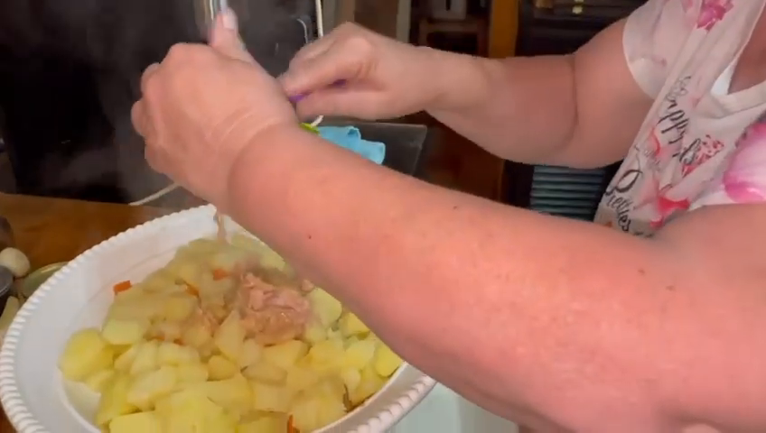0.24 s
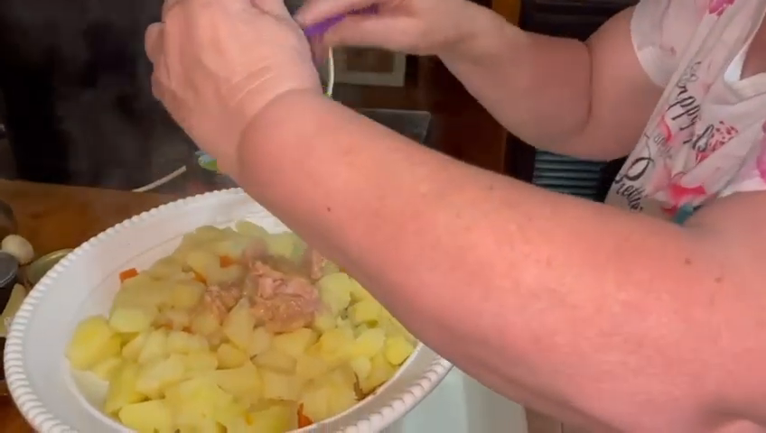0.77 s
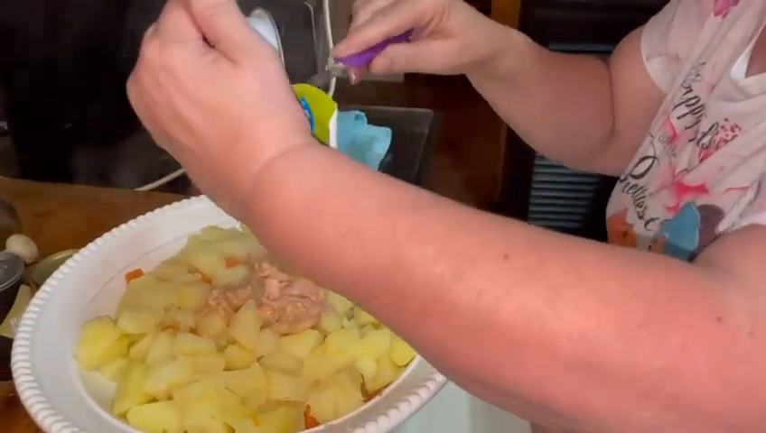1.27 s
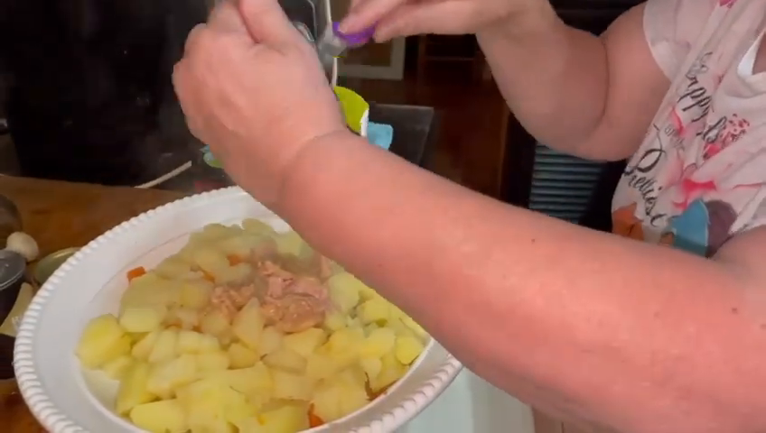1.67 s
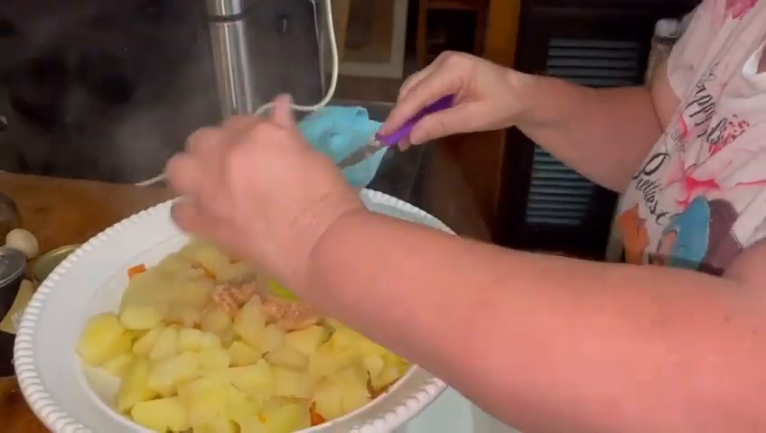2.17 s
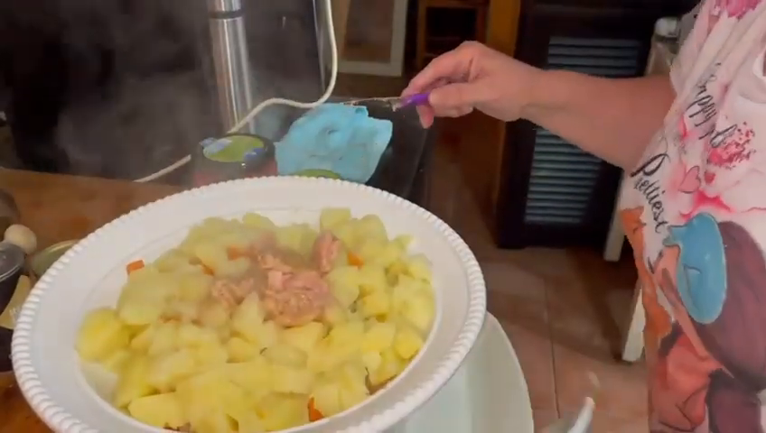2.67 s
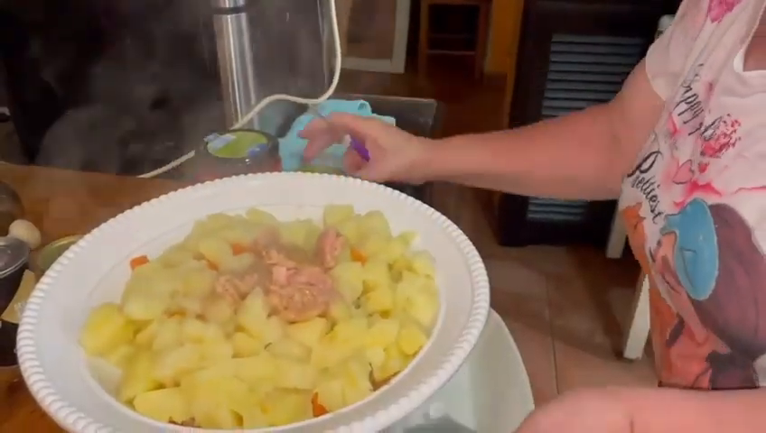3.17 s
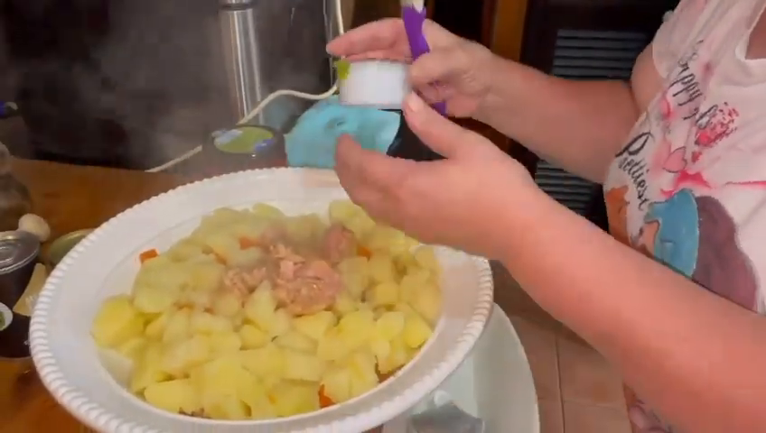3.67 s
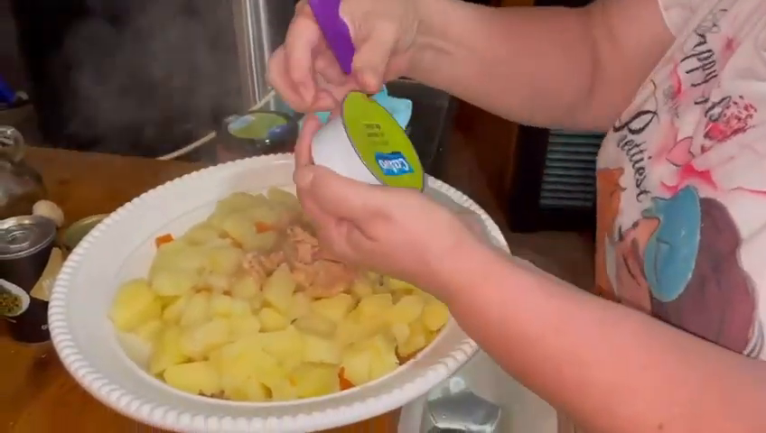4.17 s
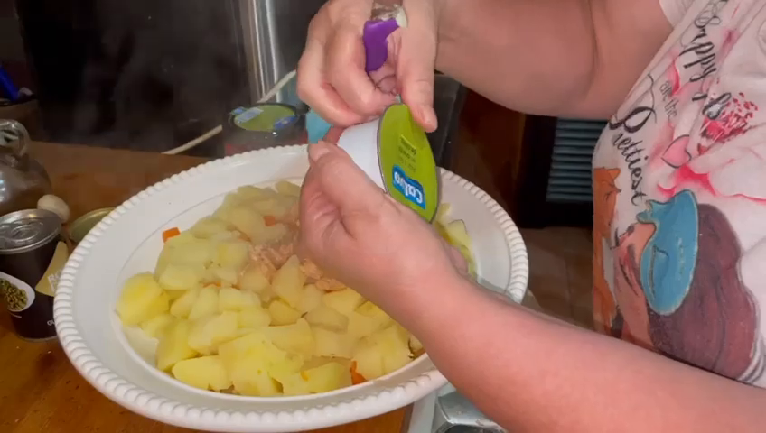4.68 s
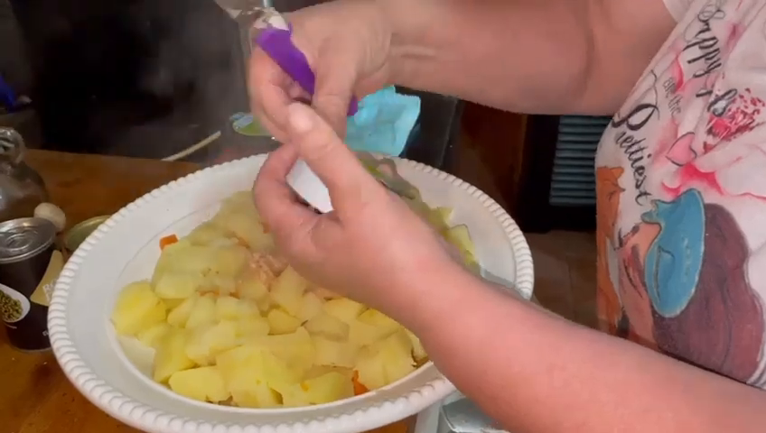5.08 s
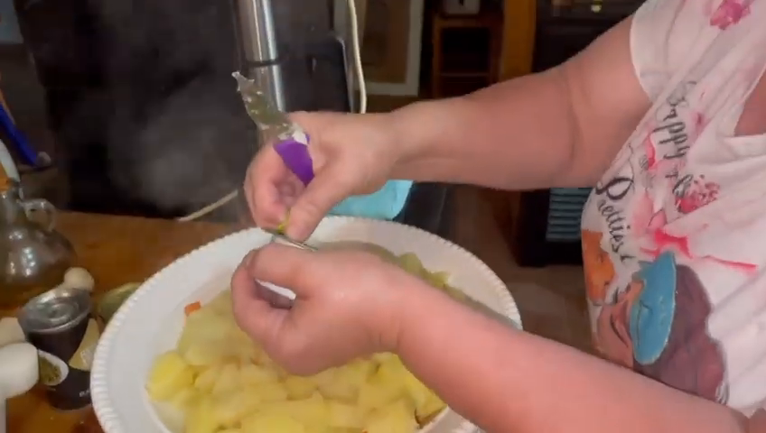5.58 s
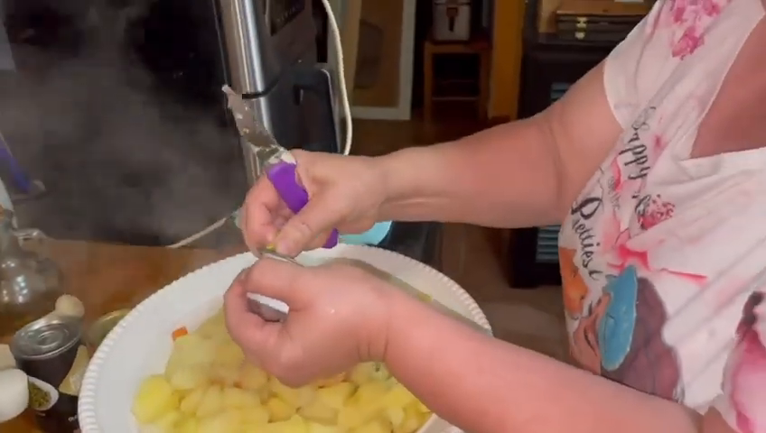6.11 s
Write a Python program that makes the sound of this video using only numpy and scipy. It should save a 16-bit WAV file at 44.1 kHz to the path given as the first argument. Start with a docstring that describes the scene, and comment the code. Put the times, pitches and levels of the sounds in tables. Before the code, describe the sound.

Close by in a home kitchen, a blade taps and rasps quickly inside a small hand-damped can, pauses, then scrapes again. The empty can drops into a hollow bin with a loud, bouncing, ringing clatter. Quiet finger rubs and dry foil snaps follow as a second lid is worked, with two soft table knocks and a sharper snap at the end. A fan swishes steadily underneath; close stereo pickup, short room tail.

```python
"""Scraping out a tin can in a kitchen

A knife taps and scrapes a small hand-held can: impacts excite damped modes, stick-slip drives rasp and screech.
The empty can clatters into a hollow bin, whose walls ring and whose air booms as decaying sines.
Fingers rub, snap and start to peel the foil lid of a second can: clicks, short modes and filtered slips.
Two soft knocks travel as gliding waves through the table; a fan swishes as modulated noise."""
import sys
import numpy as np
from scipy import signal
from scipy.fft import rfft, irfft, next_fast_len
from scipy.io import wavfile
from scipy.ndimage import uniform_filter1d

SR = 44100
rng = np.random.default_rng(int(sys.argv[2]) if len(sys.argv) > 2 else 0)


def wav_out(sig):
    """Save sig, one row per channel (or a flat mono array), as 16-bit PCM at SR to the path in sys.argv[1]."""
    wavfile.write(sys.argv[1], SR, np.round(np.clip(np.atleast_2d(sig).T, -1, 1) * 32767).astype(np.int16))


N = 279946
T = np.arange(N) / SR  # s

# Knife taps: [t/s, relative level/dB, hardness/(dB per octave), clank/dB, fizz/dB, drag re level/dB,
# then rings of the struck spot: wall f/Hz, level/dB, rim f/Hz, level/dB, side f/Hz, level/dB, edge f/Hz, level/dB]
KNIFE_TAPS = [(0.092, -39, 3, 6, 0, -20, 1218, 17.5, 2110, 19.5, 4200, 27, 6440, 20.5),
              (0.123, -54, -5, 8, -2, -12, 1250, 2, 2130, 35, 4170, 7, 6330, 8),
              (0.146, -38.5, 3, 1.5, -2.5, -3, 1051, 2.5, 1868, 8, 2270, 7, 4180, 18),
              (0.282, -36.5, 2.5, -5, 1.5, -14, 1114, 15, 3060, 16, 3881, 25, 5830, 18),
              (0.357, -35, 0, -8.5, 2.5, -25, 974, 15, 1720, 6, 5200, 18, 5900, 10),
              (0.488, -31.5, 5, -4, -2.5, -30, 1842, 16, 2390, 17, 5190, 10, 6570, 9),
              (0.561, -36.5, 0.5, -1.5, 5, -20, 1034, 20, 1802, 15.5, 5300, 15, 6440, 23),
              (0.7, -29, 5, -3, -4.5, -19, 980, 11, 2452, 19, 3860, 7, 5330, 24.5),
              (0.761, -36, 1, -6, -2.5, -14, 1100, 13, 1660, 12, 4650, 18, 5220, 21),
              (0.907, -43, -4.5, 7.5, -29, -2, 980, 9.5, 1740, 16.5, 2450, 11, 3880, 16),
              (0.968, -36.5, -3.5, -3, 16, -19, 1053, 13.5, 1664, 18.5, 5070, 16.5, 6642, 15),
              (1.415, -38.5, -0.5, -2, 4, -7.5, 1073, 21, 2520, 21, 3760, 25.5, 6900, 18),
              (1.444, -43.5, -4.5, 3.5, 11, -10, 1073, 14.5, 1440, 9.5, 2490, 0.5, 3762, 18),
              (1.484, -50.5, -2, -4, 5, -14, 1100, -1, 2480, 6, 3780, 25, 5400, 25),
              (1.623, -34.5, 4, 6.5, -4, -2.5, 1298, 17.5, 1986, 25.5, 2783, 14, 6900, 17),
              (1.67, -38, 4, -2.5, -4, -6, 1571, 8, 1964, 23, 4700, 10, 6500, 12),
              (1.815, -34, 3, -3, 7, -31, 1036, 19, 1667, 23, 3843, 17.5, 6664, 15)]
# Can landing in the bin: [t/s, relative level/dB, hardness/(dB per octave), clank/dB,
# then rings of the landing spot: bin wall f/Hz, level/dB, can rim f/Hz, level/dB, can side f/Hz, level/dB]
BIN_BOUNCES = [(2.865, -40.5, -3, 2, 480, 13.5, 1070, 12, 2500, 8),
               (2.871, -16, 0.6, -7.5, 457, 20.5, 1012, 13, 2880, 8.5),
               (2.888, -27, 7.5, 0, 581, 8, 1071, 16, 6350, 10.5),
               (2.904, -22.5, -0.6, 0.5, 452, 17, 796, 19.5, 2500, 15.5),
               (2.931, -21, 1, -3, 446, 19, 1146, 19.5, 2088, 9),
               (2.96, -33.5, 0, 5.5, 425, 11, 909, 14, 1790, 12.5),
               (2.988, -24, 0, -7, 430, 18, 872, 14, 3811, 13),
               (3.0, -28, 2, -2, 436, 18, 850, 20, 2500, 12.5),
               (3.0097, -26.5, 3.5, -1, 450, 15.5, 1275, 11, 5470, 12.5),
               (3.014, -22.5, -1.5, -8.5, 554, 15.5, 825, 17, 5900, 13.5),
               (3.036, -36.5, -5.5, -5, 560, 23, 802, 6.5, 2480, 6.5),
               (3.045, -38.5, -4.5, -5.5, 570, 24.5, 1095, 15, 2470, 7.5),
               (3.076, -44, -4.5, 1.5, 586, 16, 759, 12, 1500, 8),
               (3.085, -38, 1, 5, 600, 10.5, 958, 11.5, 1410, 6),
               (3.095, -32.5, 0, 5, 425, 12, 855, 23.5, 2099, 9),
               (3.125, -25.5, 0, 1, 403, 8.5, 900, 18, 2010, 6.5),
               (3.138, -47, -3.5, 1.5, 720, 15, 1165, 13, 2400, 8.5),
               (3.15, -41.5, -3.5, 5, 333, 11.5, 818, 12.5, 1334, 23),
               (3.185, -33, 0, 1.5, 532, 13.5, 1110, 15, 1594, 12.5)]
# Snaps of foil and fingers: [t/s, relative level/dB, hardness/(dB per octave), clank/dB,
# first f/Hz and second f/Hz of the buckling patch]
FOIL_SNAPS = [(2.7868, -64, 4.5, 4.5, 2440, 4100), (4.194, -48, -0.5, -7, 1470, 5100),
              (4.25, -48, -3, 2, 2350, 5550), (4.4535, -45, 6, -3, 2270, 7000),
              (4.61, -52, 3.5, 2.5, 2400, 3800), (4.641, -53, 0, 4, 3460, 5140),
              (4.655, -58, 0.5, 3.5, 1660, 5030), (4.691, -72.5, 13, 9, 2450, 5150),
              (4.799, -58.5, 7, -2.5, 3180, 7870), (4.3, -61, -2.5, 0, 2300, 4400),
              (4.512, -62, -2, 3, 2400, 4200), (4.806, -56, 2.5, -3, 3130, 5200),
              (5.712, -65.5, 2, 0, 2300, 5200), (4.953, -53, -6, -10, 2360, 5190),
              (5.0916, -42, -5, -2.5, 2174, 5720), (5.357, -104, 26, -10, 1880, 6760),
              (5.499, -58.5, -5.5, 8, 3290, 1680), (5.963, -47, -2.5, -4, 1590, 3200),
              (6.183, -37.5, 0.8, -8.5, 4300, 6500)]
# Modes of the can, damped by the hand: [f/Hz, level/dB, t60/s]
CAN_MODES = [(1064, 1.5, 0.1), (1670, -1, 0.08), (1900, -6.5, 0.08), (2462, 0, 0.11), (2980, -11.5, 0.06),
             (3700, 0.5, 0.12), (4680, -6, 0.038), (5240, -0.5, 0.07), (5950, -3.5, 0.13),
             (6470, -6, 0.036), (6750, -5, .06), (7460, -1, 0.075), (9160, 5, 0.027), (11040, -4.5, 0.056)]
# Resonances of the struck spot, in the order wall, rim, side, edge:
# [t60/s when struck, level change/dB when dragged, bandwidth/Hz when dragged]
STRUCK_SPOT = [(0.042, -13.5, 110), (0.032, -21.5, 400), (0.039, -25, 260), (0.035, -36, 300)]
# Limits of the four registers body, clank, edge, fizz: [f/Hz]
REGISTER_EDGES = [300, 1400, 3000, 7500, 12000]
# Colour of the blade's rasp: [f/Hz, level/dB]
RASP_COLOUR = [(100, -64), (900, -6.5), (2400, 4), (4000, 5), (5600, 7.5), (6900, 8.5), (8000, -25.5),
               (12000, -30)]
# Colour of its high fizz: [f/Hz, level/dB]
FIZZ_COLOUR = [(100, -62), (6000, -2.5), (8500, -14.5), (9500, 5), (11300, 4), (12500, 3.5)]
PIVOT_HZ = 2000  # hardness tilts a blow about this pitch
DRAG_RISE_S, DRAG_FALL_S = 0.0058, 0.015  # after a tap the blade bites, then skids to rest


def amp(db):
    """Level definition: decibels to amplitude gain."""
    return 10 ** (np.asarray(db) / 20)


def unit(x):
    """Power normalisation: scales to rms 1."""
    return x / np.sqrt(np.mean(x ** 2) + 1e-20)


def read(points, hz):
    """Logarithmic pitch scale: interpolates a table linearly in log frequency."""
    f, value = np.transpose(points)
    return np.interp(np.log(hz + 1), np.log(f + 1), value)


def add(mix, s, sound):
    """Superposition: adds a sound to the mix at time s."""
    part = mix[:, max(round(s * SR), 0):][:, :sound.shape[-1]]
    part += sound[..., :part.shape[1]]


def tint(x, points):
    """Minimum phase: a causal filter whose phase is the Hilbert transform of its log gain."""
    n = next_fast_len(x.shape[-1] + 2 ** 11)
    log_gain = np.log(amp(read(points, abs(np.fft.fftfreq(n, 1 / SR)))))
    response = np.exp(np.conj(signal.hilbert(log_gain)))
    return np.fft.ifft(np.fft.fft(x, n) * response).real[..., :x.shape[-1]]


def diffuse(pair):
    """Spatial coherence: two unrelated signals become one diffuse field at two close ports."""
    # Coherence of the two ports: [f/Hz, correlation]
    coherence = [(50, 1), (300, 0.84), (700, 0.31), (1500, 0.53), (4000, 0.086), (8000, 0.47),
                 (11000, 0.21)]
    n = pair.shape[1]
    same = np.clip(read(coherence, np.fft.rfftfreq(n, 1 / SR)), -1, 1)
    mid, side = rfft(pair) * np.sqrt([(1 + same) / 2, (1 - same) / 2])
    return irfft([mid + side, mid - side], n)


def skid(rise_s, fall_s):
    """Frictional decay: the envelope of a contact that builds quickly and dies away."""
    t = T[:SR // 4]
    return (1 - np.exp(-t / rise_s)) * np.exp(-t / fall_s)


def swell(s, length):
    """Gaussian envelope of a sound that swells and fades about time s."""
    return np.exp(-(2 * (T - s) / length) ** 2)


def resonance(x, hz, width):
    """Heterodyned double pole: a steep resonance, fixed or gliding, at rms 1."""
    turn = np.exp(2j * np.pi * np.cumsum(hz * np.ones(x.shape[-1])) / SR)
    r = np.exp(-np.pi * width / SR)  # pole radius
    baseband = signal.lfilter([1], [1, -2 * r, r * r], x / turn)
    return unit((turn * baseband).real)


def slips(per_s, size_db, count=N):
    """Stick-slip friction: a random train of tiny clicks of uneven size."""
    spread = np.minimum(rng.exponential(1, (2, count)), 4)
    size = amp(size_db * spread) * rng.choice([-1, 1], (2, count))
    return diffuse(size * (rng.random((2, count)) < per_s / SR))


def pings(count):
    """Granular excitation: slips ping patches of the wall as brief grains of random pitch and size."""
    low_limit, high_limit, decay_s, spread_db = 1750, 12120, .0016, 3.5  # limits of pitch in Hz
    t, out = T[:SR // 120], []
    for _ in range(2):
        at, pitch, chance = rng.random((count // 16, 3)).T[..., None]
        hz = low_limit + pitch * (high_limit - low_limit)
        size = amp(spread_db * np.minimum(-np.log(chance), 3))
        grain = size * np.sin(2 * np.pi * hz * t) * np.exp(-t / decay_s)
        place = (at * count).astype(int) + np.arange(len(t))
        out.append(np.bincount(place.ravel(), grain.ravel(), count)[:count])
    return diffuse(np.array(out))


def voiced(voice, level_db, hardness, clank_db, pan_db, pan_per_hardness, fizz_db=0):
    """Contact stiffness: a hard blow is brighter and may radiate more to the left; loose sheet adds clank.

    Returns the level, the four register strengths and the left-minus-right difference, all in dB."""
    centres = np.sqrt(np.multiply(REGISTER_EDGES[:-1], REGISTER_EDGES[1:]))
    body, clank, edge, fizz = np.array(voice) + hardness * np.log2(centres / PIVOT_HZ)
    return level_db, body, clank + clank_db, edge, fizz + fizz_db, pan_db + pan_per_hardness * hardness


def blow(row, modes, colour, crash_t60, ring_db, rise, spread, uneven_db, tick, flex=0):
    """Modal impact: a tick and a short noise crash of dense modes, plus a few longer discrete modes."""
    flex_hz = 45.4  # thin walls flex to and fro after a blow and bend their own pitch
    level_db, *voice, pan_db = row
    t = T[:SR // 5]
    noise = rng.standard_normal((3, len(t)))
    contact = amp(-60 * t / crash_t60) + tick * np.exp(-((t - .0015) / 0.000089) ** 2)
    crash = tint((noise[0] + spread * diffuse(noise[1:])) * contact, colour)
    ring = np.zeros_like(crash)
    bent = t + flex * np.sin(2 * np.pi * (flex_hz * t + rng.random())) / (2 * np.pi * flex_hz)
    for hz, db, t60 in modes:
        # short waves reach the two ports more unlike than long ones
        unlike = spread * min(hz / 1500, 1) * rng.standard_normal((2, 1))
        phase = 2 * np.pi * rng.random() + unlike
        decay = amp(db + uneven_db * rng.standard_normal() - 60 * t / t60)
        ring += decay * np.sin(2 * np.pi * hz * bent + phase)
    hit = (crash + amp(ring_db) * ring) * (1 - np.exp(-t / rise)) ** 2
    # the first 20 ms carry the strength of the blow in each register
    head = SR // 50
    power = np.mean(abs(rfft(hit[:, :head], SR)) ** 2, 0) * 2 / (SR * head)  # 1 Hz bins
    gains = [(np.sqrt(lo * hi), db - 10 * np.log10(power[lo:hi].sum()))
             for lo, hi, db in zip(REGISTER_EDGES, REGISTER_EDGES[1:], voice)]
    return tint(hit, gains) * amp(level_db + np.array([[pan_db], [-pan_db]]) / 2)


def knife():
    """Modal superposition: the blade knocks the hand-held can; the struck spot adds brief, strong rings."""
    # Average tap: (body level/dB, clank level/dB, edge level/dB, fizz level/dB)
    tap_voice = (-0.5, 1.5, 0, -14.5)
    # Colour of the contact noise: [f/Hz, level/dB]
    tap_colour = [(60, -27), (250, -7.5), (600, -2.5), (1000, -3.5), (3000, -1), (6700, 4.5), (7700, -9),
                  (8700, -21), (10500, -13), (12000, -21)]
    grip_detune = 0.011  # random share by which each mode shifts
    out = np.zeros((2, N))
    for s, level_db, hardness, clank_db, fizz_db, _, *rings in KNIFE_TAPS:
        can = [(hz * (1 + grip_detune * rng.standard_normal()), db, t60) for hz, db, t60 in CAN_MODES]
        spot = [(hz, db, t60) for hz, db, (t60, _, _) in zip(rings[::2], rings[1::2], STRUCK_SPOT)]
        row = voiced(tap_voice, level_db, hardness, clank_db, pan_db=-0.5, pan_per_hardness=0.54,
                     fizz_db=fizz_db)
        add(out, s, blow(row, can + spot, tap_colour, crash_t60=0.024, ring_db=-25.5, rise=0.0015,
                         spread=1.0, uneven_db=4, tick=0.089, flex=0.015))
    return out * amp(-6)


def judder():
    """Friction-driven resonance: irregular slips of the blade keep the struck spot ringing after a tap."""
    out, fade = np.zeros((2, N)), skid(DRAG_RISE_S, DRAG_FALL_S)
    for s, level_db, hardness, _, _, drag_db, *rings in KNIFE_TAPS:
        slipping = slips(per_s=840, size_db=1.5, count=len(fade))
        for hz, ring_db, (_, db, width) in zip(rings[::2], rings[1::2], STRUCK_SPOT):
            tilt_db = hardness * np.log2(hz / PIVOT_HZ)
            gain = amp(level_db + drag_db + ring_db + db + tilt_db)
            add(out, s, gain * fade * resonance(slipping, hz, width))
    return out


def strokes():
    """Stick-slip: gritty slips of the blade rasp, ring the can and drive a sinking contact resonance."""
    # Free strokes along the wall: [middle t/s, length/s, rasp level/dB, fizz level/dB,
    # ring level of a low can mode/dB, screech level/dB, screech f/Hz at the middle]
    stroke_rows = [(0.003, 0.062, -48.5, -47, -68.5, -56, 6500), (0.168, 0.023, -55, -58, -71, -59, 2190),
                   (0.218, 0.05, -44, -50, -74, -48, 6300), (0.388, 0.096, -63, -62.5, -71.5, -67, 5100),
                   (0.626, 0.032, -50.5, -46, -62.5, -57, 5150),
                   (0.723, 0.05, -46.5, -56, -49.5, -43.5, 5800),
                   (0.771, 0.026, -51, -55, -55.5, -44, 1770), (0.833, 0.055, -49.5, -52.5, -75, -53, 6300),
                   (0.952, 0.029, -54, -70, -62, -54, 3860), (0.992, 0.13, -58, -69.5, -51, -70, 6500),
                   (1.039, 0.035, -61, -66, -75.5, -49.5, 5400),
                   (1.503, 0.059, -53.5, -59.5, -76, -67, 3780),
                   (1.636, 0.03, -68.5, -70, -70, -38.5, 1280), (1.655, 0.057, -57, -63, -67.5, -42, 1795),
                   (1.691, 0.06, -69.5, -65.5, -70, -54.5, 1280), (1.733, 0.05, -70, -70, -70.5, -54, 1870)]
    screech_width_hz, screech_sag = 280, 1.0  # sag in octaves per s
    grit_per_s, grit_db = 800, 2  # rate of slips, spread of their size
    catch_db, grain_catch_db = 3, -0.5  # how far slips and grains follow the catching of the edge
    out, count = np.zeros((2, N)), SR // 3
    for s, length, rasp_db, fizz_db, ring_db, screech_db, screech_hz in stroke_rows:
        start = max(s - count / SR / 2, 0)
        t = T[:count] + start - s
        catch = unit(uniform_filter1d(rng.standard_normal(count), size=250))
        grit = slips(grit_per_s, grit_db, count=count) * amp(catch_db * catch)
        screech = resonance(grit, screech_hz * 2 ** (-screech_sag * t), screech_width_hz)
        ring = resonance(grit, hz=1100, width=80)
        grains = pings(count) * amp(grain_catch_db * catch)
        rasp, fizz = tint(grains, RASP_COLOUR), tint(grains, FIZZ_COLOUR)
        shape = np.exp(-(2 * t / length) ** 2)
        shape_rms = np.sqrt(np.mean(shape ** 2))
        for db, layer in (rasp_db, rasp), (fizz_db, fizz), (ring_db, ring), (screech_db, screech):
            add(out, start, amp(db) * unit(shape * layer) * shape_rms)
    return out


def scraping():
    """Stick-slip noise: the blade rasps after each tap, fingers rub the metal, and the lid starts to peel."""
    # Fingers sliding over can and lid: [middle t/s, length/s, level/dB]
    rub_rows = [(2.423, 0.11, -74), (3.776, 0.34, -72.5), (4.262, 0.074, -74.5), (4.506, 0.087, -68),
                (4.663, 0.063, -59), (4.788, 0.024, -56), (5.32, 0.16, -71), (5.692, 0.085, -72),
                (6.188, 0.017, -41)]
    # Lid peeling, its course: [t/s, level/dB]
    peel_course = [(6.185, -63), (6.2, -55.5), (6.23, -53), (6.28, -55), (6.35, -67.5)]
    # Lid peeling, its colour: [f/Hz, level/dB]
    peel_colour = [(300, -49), (1100, 4), (3400, -7), (4150, 16), (4750, 12), (5500, -16), (6500, 12),
                   (7400, -9), (8400, -41.5), (10500, 1.5), (12000, -4)]
    drag_rasp_db, rub_fizz_db = -14.5, 1  # rasp re the drag, fizz re the rasp
    grip = unit(uniform_filter1d(rng.standard_normal(N), size=300))  # the edge catches and lets go
    grains = slips(per_s=2200, size_db=3.6) * amp(2.5 * grip)
    rasp, fizz = unit(tint(grains, RASP_COLOUR)), unit(tint(grains, FIZZ_COLOUR))
    drags = np.zeros((1, N))
    for s, level_db, _, _, _, drag_db, *_ in KNIFE_TAPS:
        add(drags, s, amp(level_db + drag_db + drag_rasp_db) * skid(DRAG_RISE_S, DRAG_FALL_S))
    rubs = sum(amp(db) * swell(s, length) for s, length, db in rub_rows)
    fingers = rubs * (rasp + amp(rub_fizz_db) * fizz)
    tearing = slips(per_s=800, size_db=1.5) * amp(2 * grip)  # the seal lets go in small jerks
    peel_db = np.interp(T, *np.transpose(peel_course), left=-200)
    return drags * rasp + fingers + amp(peel_db) * unit(tint(tearing, peel_colour))


def clatter():
    """Coupled modes: the can bounces and rings in the bin; its weight detunes the walls at each landing."""
    # Average bounce: (body level/dB, clank level/dB, edge level/dB, fizz level/dB)
    bounce_voice = (8, 1, -4, -14)
    # Colour of the contact noise: [f/Hz, level/dB]
    bin_colour = [(30, -23), (80, -16.5), (130, -1.5), (200, -7.5), (330, 0.5), (450, 2), (900, 5),
                  (1600, -1.5), (4500, -4.5), (6600, -1.5), (8000, -11.5), (11000, -13.5), (12500, -21.5)]
    # Modes of the bin: [f/Hz, level/dB, t60/s]
    bin_modes = [(295, -9.5, 0.2), (443, 0, 0.19), (467, -8.5, 0.18), (547, -2.5, 0.23), (592, -2, 0.28),
                 (628, -9.5, 0.18), (729, -7, 0.17), (793, -5.5, 0.33), (850, -6.5, 0.14), (913, -9.5, .12),
                 (1058, -8.5, 0.077), (1107, -6.5, 0.28), (1293, -3, .1)]
    # Ring times where the can lands, in the order bin wall, can rim, can side: [t60/s]
    landing_t60 = [0.07, 0.05, 0.04]
    # Direction of the bin: [f/Hz, level/dB more at the left port and less at the right]
    bin_side = [(100, 1), (280, 0.5), (480, -1.5), (750, -3.5), (1200, -2.5), (2500, 0), (8000, 0.5)]
    bin_detune, can_scatter, can_db = 0.019, 0.028, 1  # random shares of f; can level re its table
    out = np.zeros((2, N))
    for s, level_db, hardness, clank_db, *rings in BIN_BOUNCES:
        walls = [(hz * (1 + bin_detune * rng.standard_normal()), db, t60) for hz, db, t60 in bin_modes]
        can = [(hz * np.exp(can_scatter * rng.standard_normal()), db + can_db, t60)
               for hz, db, t60 in CAN_MODES]
        spot = list(zip(rings[::2], rings[1::2], landing_t60))
        row = voiced(bounce_voice, level_db, hardness, clank_db, pan_db=-0.6, pan_per_hardness=0.73)
        add(out, s, blow(row, walls + can + spot, bin_colour, crash_t60=0.035, ring_db=-25.0, rise=0.00088,
                         spread=0.59, uneven_db=4.0, tick=0.81, flex=0.015))
    left = tint(out[0], bin_side)
    right = tint(out[1], [(hz, -db) for hz, db in bin_side])
    balance = [(40, -3.0), (85, -4.5), (170, -3.5), (300, -1.5), (12000, -0.5)]  # f/Hz, level/dB
    return tint(np.array([left, right]), balance) * amp(-5.5)


def boom():
    """Cavity resonance: the air in the bin swells and booms after each bounce."""
    # Resonances of the enclosed air: [f/Hz, level/dB re the tabulated bounce level]
    air_modes = [(62, -29.5), (88, -32), (111, -18), (135, -21), (162, -20)]
    out, fade = np.zeros((2, N)), skid(rise_s=.018, fall_s=.055)
    t = T[:len(fade)]
    for s, level_db, *_ in BIN_BOUNCES:
        swing = sum(amp(level_db + db) * np.sin(2 * np.pi * (hz * t + rng.random())) for hz, db in air_modes)
        add(out, s, fade * swing)
    return out


def foil():
    """Snap-through buckling: the lid of the second can jumps in dry snaps with two short modes each."""
    # Average snap: (body level/dB, clank level/dB, edge level/dB, fizz level/dB)
    snap_voice = (-7, -1, 15, -11.5)
    # Colour of the contact noise: [f/Hz, level/dB]
    snap_colour = [(60, -23.5), (500, -25.5), (1200, -14), (2500, -1), (5500, -9.5), (7000, 8), (8300, 8),
                   (11000, 4), (12500, -7)]
    out = np.zeros((2, N))
    for s, level_db, hardness, clank_db, first_hz, second_hz in FOIL_SNAPS:
        modes = [(first_hz, -3, .028), (second_hz, -5, .018)]  # f/Hz, level/dB, t60/s
        row = voiced(snap_voice, level_db, hardness, clank_db, pan_db=1.5, pan_per_hardness=0)
        add(out, s, blow(row, modes, snap_colour, crash_t60=.032, ring_db=-7, rise=.0006,
                         spread=.7, uneven_db=1, tick=1.2))
    return tint(out, [(300, -19.5), (900, -0.5), (2000, -5.0), (6500, -13), (10000, -2.5)])


def crackle():
    """Crease relaxation: after each snap the foil settles in a few random, fading ticks."""
    # Colour of the ticks: [f/Hz, level/dB]
    crackle_colour = [(300, -30.5), (1200, -7.5), (2400, -1.5), (4200, -1.5), (6900, -0.5), (8300, -16),
                      (10500, -5), (12500, -9)]
    per_s, re_snap_db = 70, -18.5  # mean rate of ticks, level re the tabulated snap
    out, fade = np.zeros((2, N)), skid(rise_s=.01, fall_s=.035)
    for s, level_db, *_ in FOIL_SNAPS:
        size = rng.uniform(-1.1, 1, len(fade))
        ticks = size * (rng.random(len(fade)) < per_s / SR) * np.sqrt(SR / per_s)
        add(out, s, amp(level_db + re_snap_db) * fade * tint(ticks, crackle_colour))
    return out


def ping():
    """Narrow-band resonance: a brief 3.3 kHz ping, driven by random clicks, rings with the snap at 5.5 s."""
    # The ping: (middle t/s, length/s, f/Hz, bandwidth/Hz, level/dB)
    ping_row = (5.503, .01, 3300, 220, -52)
    s, length, hz, width, db = ping_row
    return amp(db) * swell(s, length) * resonance(slips(per_s=840, size_db=1.5), hz, width)


def table(low_hz=52, sweep_hz=190, glide=0.0068):
    """Dispersion: a soft pat, then bending waves in the table top whose high frequencies arrive first."""
    # Knocks: [t/s, table thud level/dB, pat level/dB]
    knock_rows = [(5.549, -44.5, -45), (6.262, -44, -38.5)]
    out, t = np.zeros((2, N)), T[:SR // 5]
    thud_hz = low_hz + sweep_hz * np.exp(-t / glide)
    thud = np.sin(2 * np.pi * np.cumsum(thud_hz) / SR) * np.exp(-((t - .022) / 0.03) ** 2)
    # the pitch of the pat falls as 3.72 / (t + 0.0048 s), from 775 Hz
    pat = np.sin(2 * np.pi * 3.72 * np.log1p(t / 0.0048)) * np.exp(-t / 0.0062)
    for s, thud_db, pat_db in knock_rows:
        add(out, s, amp(thud_db) * thud + amp(pat_db) * pat)
    return out


def fan():
    """Amplitude modulation: steady air noise, a faint motor drone, and swishes of three unequal blades."""
    # Colour of the room air: [f/Hz, level/dB]
    air_colour = [(15, -33.5), (25, -11.5), (81, 7.5), (183, -3), (380, -6.5), (422, -5), (456, -7.5),
                  (625, -5), (975, -13), (1560, -15), (4110, -39), (6940, -28), (7910, -44.5), (10500, -37),
                  (13000, -48.5)]
    # Colour of the passing blades: [f/Hz, level/dB]
    swish_colour = [(200, -36), (800, -5), (1150, -0.5), (1550, -1.5), (1950, 1.5), (2250, -9), (3400, -18),
                    (4200, -28.5), (9000, -46)]
    # second colour of the air and colour of the drone: f/Hz, level/dB
    air_balance = [(30, -5.5), (60, -6.0), (160, -10.0), (220, -1.5), (600, -1), (1100, -2.0),
                   (1900, 2.5), (3500, 12.5), (6000, -12.5), (8000, -11.5), (10000, -4.5)]
    drone_colour = [(100, -50), (400, -22), (530, -5), (615, 0), (680, -9), (900, -30), (2000, -80)]
    blade_rate, blade_s = 6.268, 2.051  # blade passages per s, time of one passage
    blade = 2 * np.pi * blade_rate * (T - blade_s)
    turn = blade / 3
    gust = unit(uniform_filter1d(rng.standard_normal(N), size=3000))
    uneven = amp(0.7 * np.cos(turn + 1.0) + 1.1 * gust)
    passing = (.5 + .5 * np.cos(blade)) ** 1.6 * uneven
    air, swish, drone = (diffuse(rng.standard_normal((2, N))) for _ in range(3))
    air = tint(amp(-57) * unit(tint(air, air_colour)), air_balance)
    swish = amp(-60.0) * passing * unit(tint(swish, swish_colour))
    drone = amp(-69) * unit(tint(drone, drone_colour))
    return air + swish + drone


def kitchen(x, wet_db, gap=0.0056):
    """Reverberation: sparse reflections from worktop and walls thicken into a short decaying tail."""
    # Reverberation time: [f/Hz, t60/s]
    room_t60 = [(100, 0.7), (500, 0.51), (1500, 0.49), (4000, 0.33), (7000, 0.31), (12000, 0.088)]
    t = T[:SR * 2 // 3]
    arrives = rng.standard_normal((2, len(t))) * (rng.random((2, len(t))) < .04 + t * 2)
    reflections = arrives / np.sqrt(0.0034 + t * 2) * (t > gap)
    hz, when, z = signal.stft(diffuse(reflections), SR, nperseg=256)
    tail = signal.istft(z * amp(-60 * when / read(room_t60, hz)[:, None]), SR)[1]
    tail /= np.sqrt(np.sum(tail ** 2) / 2)
    return x + amp(wet_db) * signal.fftconvolve(x.mean(0)[None], tail, axes=1)[:, :N]


def scene():
    """Superposition: near sounds over the bowl, the bin farther off, the table and the fan."""
    tapped = kitchen(knife() + judder(), wet_db=-8.0)
    handled = kitchen(foil() + crackle() + strokes() + scraping() + ping(), wet_db=-8.5)
    binned = kitchen(clatter() + boom(), wet_db=-10.5)
    return tapped + handled + binned + table() + fan()


def record(dry):
    """Interchannel phase: the two microphone ports differ in phase; a linear-phase low-pass follows."""
    # Phase of the left port re the right: [f/Hz, phase/rad]
    port_phase = [(100, 0), (350, 0), (600, -.6), (950, .6), (1700, 0), (2700, .7), (4400, 0), (5400, .3),
                  (6700, -.7), (7600, -2.9), (9300, -3.4), (10000, -6.1), (12500, -6.28)]
    turn = np.exp(.5j * read(port_phase, np.fft.rfftfreq(N, 1 / SR)))
    ported = irfft(rfft(dry) * np.array([turn, turn.conj()]), N)
    low_pass = signal.firwin(161, 12000, window=("kaiser", 8), fs=SR)  # cutoff in Hz
    return signal.oaconvolve(ported, low_pass[None], "same")


dry = scene()
out = record(dry)
wav_out(out)
```